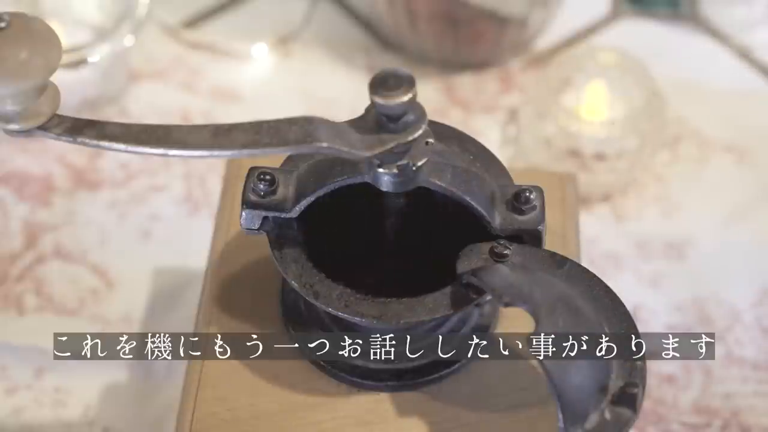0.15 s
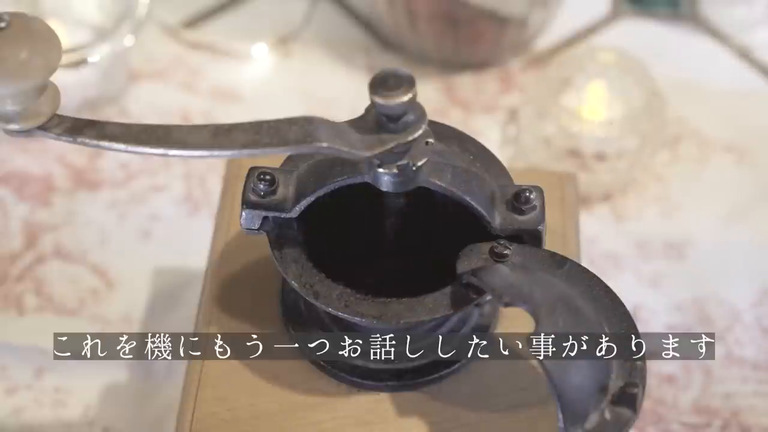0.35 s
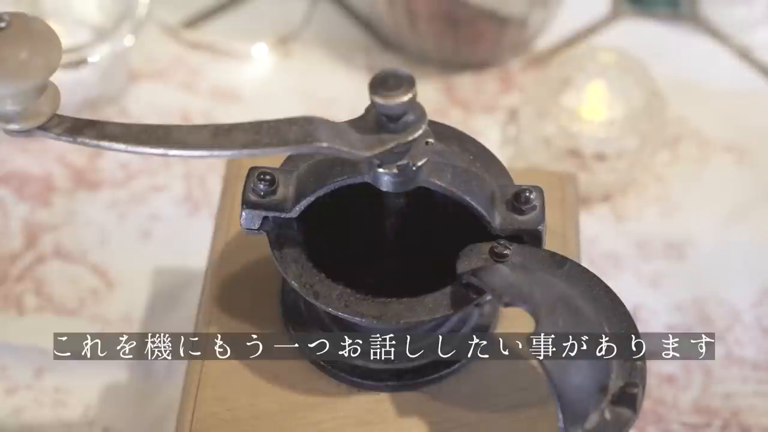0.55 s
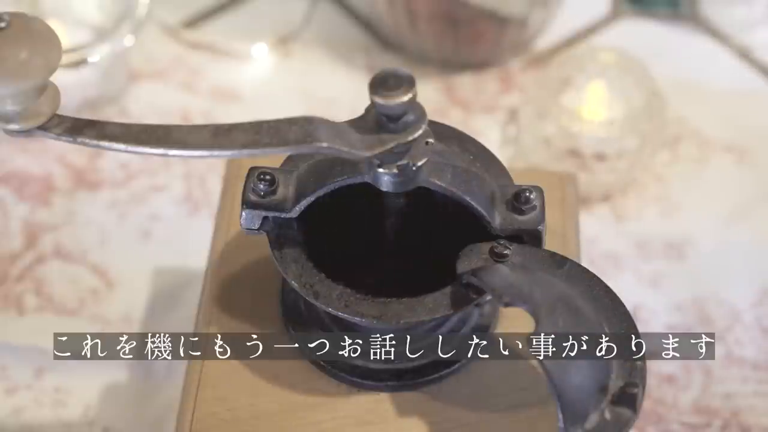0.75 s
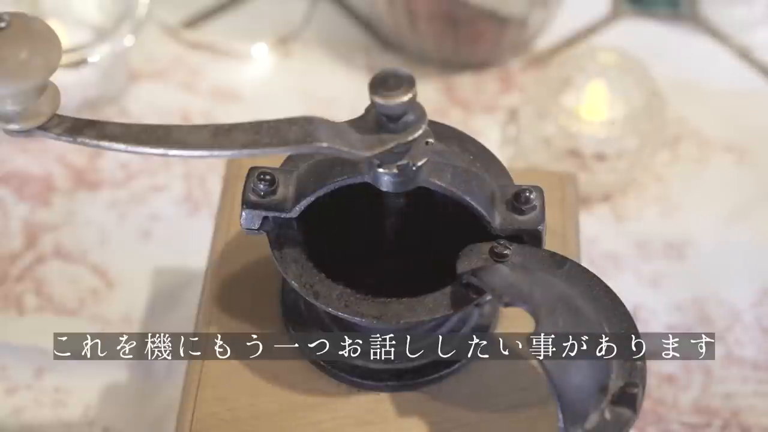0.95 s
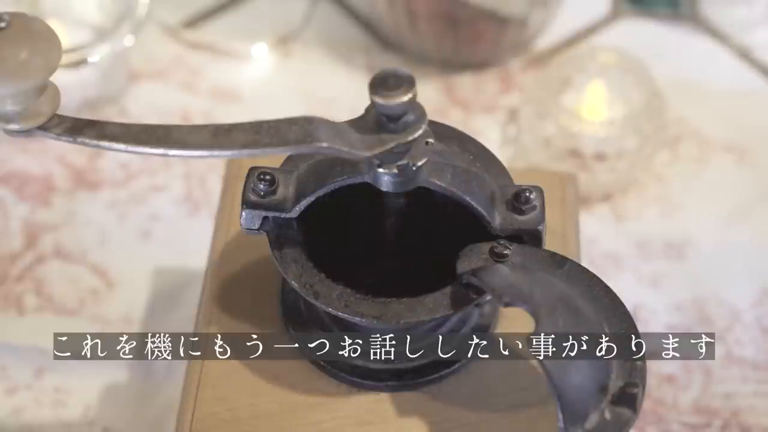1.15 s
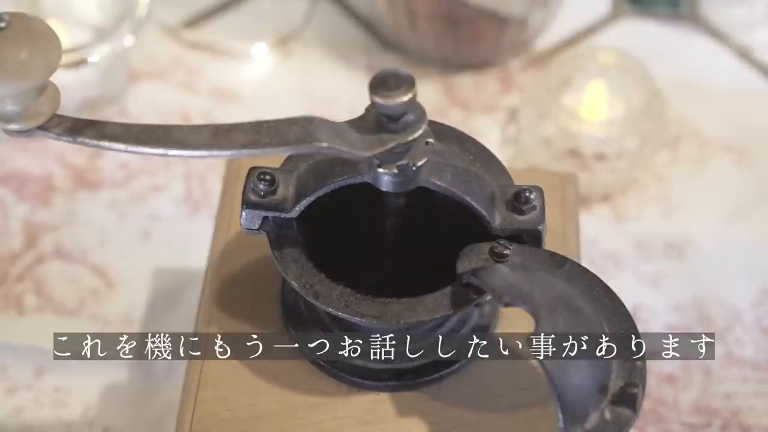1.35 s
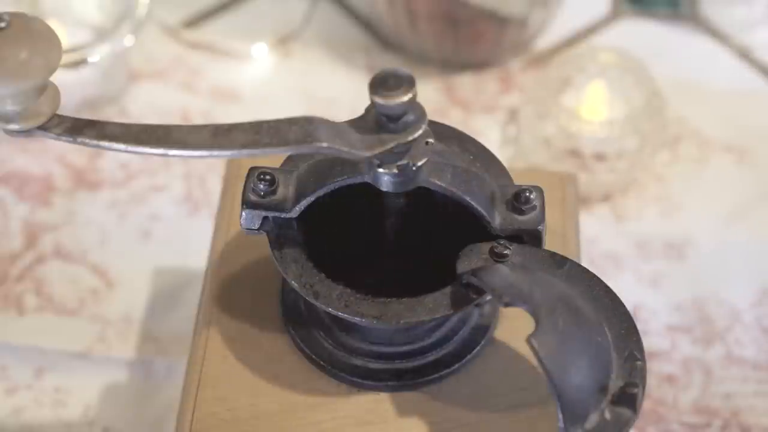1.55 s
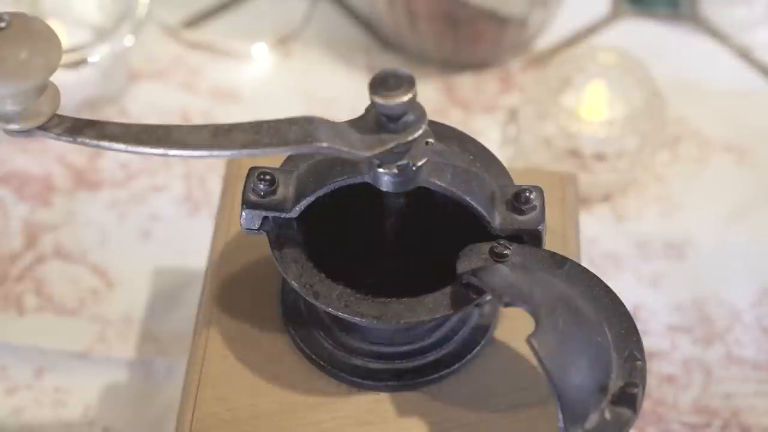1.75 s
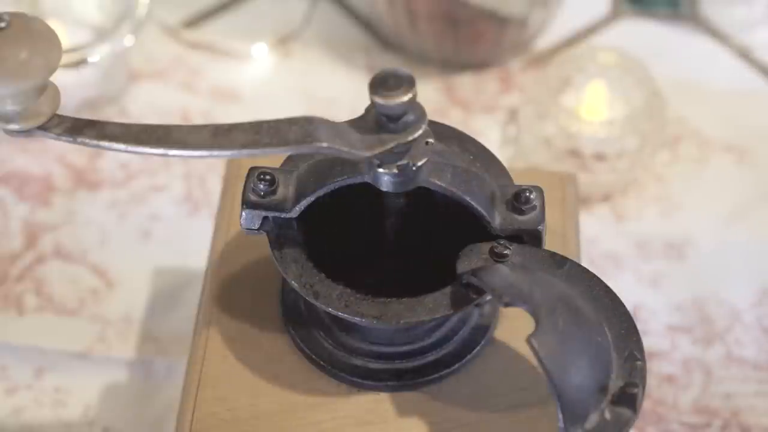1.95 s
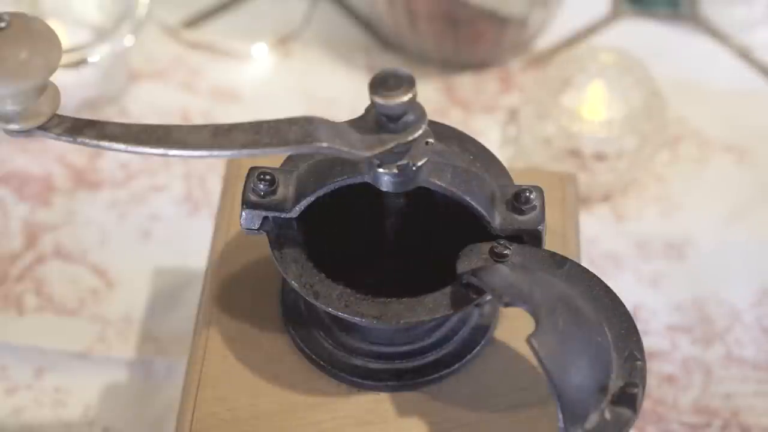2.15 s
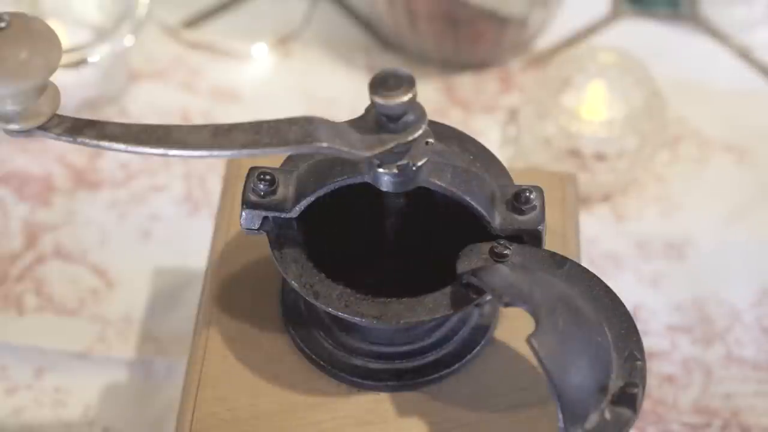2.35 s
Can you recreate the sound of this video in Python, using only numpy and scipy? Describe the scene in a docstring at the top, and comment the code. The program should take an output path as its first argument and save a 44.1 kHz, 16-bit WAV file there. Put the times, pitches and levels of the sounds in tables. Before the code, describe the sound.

Coffee beans rattle into a hand grinder's iron hopper in crisp bursts, the wooden base knocking at first; midway the lid clanks in a quick double blow, then beans thin out. Close microphone, quiet small kitchen, mono.

```python
"""Coffee beans in a hand grinder

Coffee beans rattle in bursts against an iron hopper: each contact excites short, damped modes.
The iron lid clanks once, in two close blows; the wooden base knocks and rumbles on the table.
Low thuds swell in the table top. A small quiet kitchen adds brief echoes, faint noise and a hum.
"""
import sys
import numpy as np
from scipy import signal
from scipy.fft import rfft, irfft, next_fast_len
from scipy.io import wavfile

SR = 44100
rng = np.random.default_rng(int(sys.argv[2]) if len(sys.argv) > 2 else 0)


def volts_from_decibels(level):
    """Turn decibel levels (scalar or array-like) into linear amplitude factors."""
    exponent = np.asarray(level, float) / 20
    return 10 ** exponent


def persist_wave(psi):
    """Save psi, clipped to +-1, as 16-bit WAV."""
    counts = np.round(np.clip(psi, -1, 1) * 32767).astype(np.int16)
    wavfile.write(sys.argv[1], SR, np.atleast_2d(counts).T)


N = 112455

# Modes of the iron hopper: f/Hz, relative level/dB, T60/s
HOPPER_MODES = [(1634, -11.5, 0.022), (1802, -9, 0.015), (3350, 0.5, 0.013), (3500, 1.5, 0.0087),
                (4400, -17.5, 0.018), (4800, -6, 0.014), (6114, 0, 0.014), (6710, 5.5, 0.0026),
                (7190, -9, 0.068), (7500, -6.5, 0.043), (8590, -9, 0.086), (9350, 1.5, .015),
                (10110, 1.5, 0.015), (11500, -11, 0.032)]
# Modes of the wooden base: f/Hz, relative level/dB, T60/s, gain per dB of depth/1
BASE_MODES = [(125, -19.5, 0.056, 0.032), (208, -16, 0.042, 0.73), (260.5, -10.5, 0.035, 0.99),
              (360.3, -7.5, 0.03, 0.27), (491, -9.5, 0.022, -0.13), (645, -7.5, 0.02, -0.41),
              (820, -2.5, 0.016, -0.26), (947, -3.5, 0.027, 0.14), (1129, -1.5, 0.016, 0.28)]


def rms_one(x):
    """Normalisation by the root mean square: scale to rms 1."""
    return x / np.sqrt(np.mean(x ** 2) + 1e-20)


def in_time(rows):
    """Linear interpolation: each column after the time becomes a curve with one value per sample."""
    times, *columns = np.transpose(rows)
    t = np.arange(N) / SR
    return [np.interp(t, times, column) for column in columns]


def at_hz(points, hz):
    """Spectral envelope: level read from a table, linear in dB over log frequency."""
    table_hz, table_db = np.array(points).T
    return np.interp(np.log(hz), np.log(table_hz), table_db)


def strike(s, db, modes, scatter_db, alike=False):
    """Modal synthesis: blows at times s excite damped modes, with newly scattered strengths each time.

    db broadcasts to blows x modes; alike gives every mode the same sign.
    """
    contact_cycles = 2.1  # a finite contact makes each mode swell in, near its own pitch
    at = np.clip((np.asarray(s) * SR).astype(int), 0, N - 1)
    shape = (len(at), len(modes))
    draw = rng.standard_normal((len(at), 2, len(modes)))
    sign = 1 if alike else np.sign(draw[:, 1])
    size = sign * volts_from_decibels(np.broadcast_to(db, shape) + scatter_db * draw[:, 0])
    out = np.zeros(N)
    for k, (hz, mode_db, t60, *_) in enumerate(modes):
        clicks = np.bincount(at, size[:, k], N) + 1e-18
        w = 2 * np.pi * min(hz, 0.45 * SR) / SR
        decay = volts_from_decibels(-60 / (t60 * SR))  # per sample
        ring = signal.lfilter([0, np.sin(w)], [1, -2 * decay * np.cos(w), decay ** 2], clicks)
        soft = np.exp(-w / (2 * contact_cycles))
        contact_gain = np.array([1, 0, -1]) * (1 - soft ** 2) / 2
        out += volts_from_decibels(mode_db) * signal.lfilter(contact_gain, [1, -2 * soft * np.cos(w), soft ** 2], ring)
    return out


def shower(per_s, spread_db):
    """Poisson-like process: random contact times and uneven, exponentially spread sizes in dB."""
    born = rng.random(N) < per_s / SR
    size = np.minimum(rng.exponential(1, N), 4)
    return np.flatnonzero(born) / SR, spread_db * size[born][:, None]


def tilt(slope_db, modes, centre_hz):
    """Spectral tilt: gain per blow and mode for a slope in dB per octave."""
    return np.outer(slope_db, np.log2(np.array(modes)[:, 0] / centre_hz))


def around(pitch_hz, narrow_db, modes):
    """Selective excitation: modes lose level per octave away from each blow's own pitch."""
    octaves = np.log2(np.array(modes)[:, 0] / pitch_hz[:, None])
    return -np.abs(narrow_db)[:, None] * np.abs(octaves)


def loudness_db(modes, per_s):
    """Energy summation: rms level of the modes under per_s unit blows a second."""
    energy = sum(volts_from_decibels(db) ** 2 * t60 for _, db, t60 in modes)
    return 10 * np.log10(per_s * energy / (4 * np.log(1000)))


def crack_modes(cycles):
    """Damped resonance: hard beans crack in closely spaced modes of T60 = cycles / f."""
    # Spectrum of a dry bean crack: f/Hz, relative level/dB
    crack_spectrum = [(1400, -38.5), (1800, -27.5), (2400, -13.5), (3360, -13), (3960, -4), (6290, -0.5),
                      (14800, -5.5), (15900, -4), (16400, -59.5)]
    return [(hz, at_hz(crack_spectrum, hz) + 20 * np.log10(hz / 6000), cycles / hz)
            for hz in np.geomspace(1500, 16200, 34)]


def bean_hits():
    """Impact excitation: loud single beans crack at a touch and two rebounds, and ring the hopper once."""
    # Loudest bean hits: t/s, level/dB before the trims below, pitch f/Hz,
    # narrowness/dB per octave (sign ignored), extra iron ring/dB
    hits = [(0.175, -28, 4900, 28, 14), (0.178, -20, 4670, 22, 13), (0.1938, -14, 4960, 20, 5),
            (0.208, -13, 4650, 11, 0), (0.2508, -21, 4820, 23, 18.5), (0.3118, -19, 8990, -1, 1.5),
            (0.35, -13.5, 3470, 16, 8), (0.376, -2.5, 3430, 12, -2.5), (0.419, -20, 3400, 11, 15.5),
            (0.564, -16.5, 7100, 13, 7.5), (0.609, -13.5, 3520, 5, 2), (0.6477, -30, 6600, 9, 13.5),
            (0.7012, -20, 6020, -1, 6.5), (0.721, -13.5, 9350, 5, -5.5), (0.728, -21, 6210, -1, 8),
            (0.7547, -14, 3400, 9, 5), (0.7781, -16, 3350, 0, -3), (0.8052, -8.5, 6160, 0.5, 6.5),
            (0.8842, -15.5, 5000, -1, 0.5), (0.8912, -9.5, 7650, 12, 5), (0.936, -18, 3400, -1, 2),
            (0.9568, -3.5, 5600, 15.5, -1), (0.9865, -10, 9500, 3.5, 0), (1.021, -5.5, 9440, 11.5, -13),
            (1.0283, -14, 9430, -0.5, -1), (1.0903, -3, 10640, 7, 6.5), (1.095, -5, 11500, 18, 4),
            (1.203, -27, 8900, 17, -8), (1.233, -41, 5840, 11, 12), (1.2485, -43, 6040, 6.5, 17.5),
            (1.2862, -38, 6490, 4.0, 2), (1.3, -32.5, 4900, 6, 15), (1.308, -13.5, 8000, 7, -12),
            (1.313, -14.5, 4970, 1, 1), (1.314, -12.5, 6940, -1, -18), (1.319, -7, 9000, 0, -11.5),
            (1.3327, -7, 10300, 16, 6), (1.351, -13, 4730, 15, -1), (1.3998, -16.5, 5940, 7, 2.5),
            (1.4075, -22, 7000, -1, -4), (1.437, -8.5, 7690, 3, -9), (1.434, -18.5, 3600, 6.5, 9),
            (1.456, -13.5, 3500, 12, 9), (1.465, -19, 3480, 13.5, 1.5), (1.5014, -12.5, 11460, 6.5, -5.5),
            (1.5064, -14.5, 15200, 1.5, -5.5), (1.514, -14.5, 6000, -1.5, -9), (1.537, -7, 8000, 7.5, -1),
            (1.561, -15, 5850, 6.5, -1), (1.591, -12, 6020, 0, 2.5), (1.593, -13, 3400, 6.5, 9.5),
            (1.5965, -18.5, 7500, 1, 9.5), (1.685, -10, 3490, 13, 3.5), (1.739, -13.5, 4920, 8, 17),
            (1.859, -19.5, 5090, 6, -8), (1.8732, -10, 6000, 0.5, 7), (1.9495, -21, 4500, 0, 9),
            (2.0249, -11, 6130, 2, 6), (2.0624, -24, 5840, 4, -8.5), (2.1354, -9.5, 6050, 5.5, 3.5),
            (2.1757, -10, 13400, 3.5, -7), (2.1861, -16, 6130, 3, 7), (2.1936, -12.5, 8590, 0.5, 4.5),
            (2.2686, -20, 6020, 2.5, 2), (2.319, -22.5, 7240, 7, 5), (2.3349, -17.5, 7030, 11.5, -3.5),
            (2.476, -55.5, 4400, -0.5, 5.5), (2.4902, -44.5, 4090, -2.5, 3),
            (2.5043, -29, 4230, 18.5, -10.5)]
    crack_db, ring_db, scatter_db = -17, -22, 5.5
    ring_narrower = 2.92  # the ring falls off this much faster around the pitch
    s, db, pitch_hz, narrow_db, iron_db = np.transpose(hits)
    snap = crack_modes(cycles=13.8)
    contacts = ((0.0002, 0.5), (0.001, -6), (0.0022, -11))  # lag/s, level/dB
    crack_s = np.concatenate([s + lag_s for lag_s, _ in contacts])
    pitch_gain = around(pitch_hz, narrow_db, snap)
    crack_level = np.vstack([(db + crack_db + contact_db)[:, None] + pitch_gain
                             for _, contact_db in contacts])
    crack = strike(crack_s, crack_level, snap, scatter_db)
    ring_level = (db + iron_db + ring_db)[:, None] + around(pitch_hz, ring_narrower * narrow_db, HOPPER_MODES)
    return crack + strike(s, ring_level, HOPPER_MODES, scatter_db)


def bean_flow():
    """Superposition of random impacts: dense small hits, each with its own pitch, crack and ring iron."""
    # Flow of beans: t/s, level/dB before trim, brightness/dB per octave, iron ring/dB before trim
    flow = [
        [0.16, -79, -6, 5],
        [0.195, -43, -7, 2.5],
        [0.294, -46, -14, -3],
        [0.32, -27, -5, 3.5],
        [0.426, -30.5, -6.5, 7],
        [0.536, -51.5, -9.5, 7],
        [0.576, -31.5, -8, 4.5],
        [0.644, -41.5, -5, 7.5],
        [0.8, -33, -1.4, 5.5],
        [0.804, -31, 0, 7.5],
        [0.836, -36, 0.7, 11.5],
        [1.018, -43, -2.6, 4.5],
        [1.08, -49, 0.5, 8],
        [1.095, -40.5, 1, 14],
        [1.15, -53.5, 4, -1],
        [1.2, -60, -1, 3],
        [1.29, -65, -15.5, -9],
        [1.315, -30.5, -9, -14.5],
        [1.345, -34.5, -6.5, -6.5],
        [1.39, -59, 2, -13],
        [1.43, -61.5, -17, 8],
        [1.445, -36.5, 8, 5.5],
        [1.495, -55.5, 0, -13],
        [1.52, -38.5, 8.5, -11.5],
        [1.53, -28, -3, 9],
        [1.544, -27, -6.5, -1],
        [1.588, -25, -6, 4.5],
        [1.656, -44, -6, 10],
        [1.694, -35, -7, 7.5],
        [1.834, -35, -7, 2.5],
        [1.87, -31, -4, 6],
        [1.912, -38.5, -2, 9],
        [2.214, -30, 1.5, 5.5],
        [2.344, -54, 2, 7.5],
        [2.456, -97, -1, -3.5],
        [2.506, -60.5, -6, -11],
        [2.55, -70, -7, -4.5],
    ]
    per_s, spread_db, scatter_db = 1400, 3.5, 4.5
    trim_db, ring_trim_db = -6, -9
    level, bright, iron = in_time(flow)
    s, db = shower(per_s, spread_db)
    at = (s * SR).astype(int)
    db = db + level[at, None] + trim_db
    own_hz = 3000 * 5 ** rng.random(len(at))  # 3 to 15 kHz
    own_narrow_db = np.full(len(at), 4.5)  # dB per octave
    out = np.zeros(N)
    for modes, share_db in ((crack_modes(cycles=72), 0), (HOPPER_MODES, ring_trim_db + iron[at, None])):
        colour_db = tilt(bright[at], modes, 4710) + around(own_hz, own_narrow_db, modes)
        out += strike(s, db + share_db - loudness_db(modes, per_s) + colour_db, modes, scatter_db)
    return out


def beans():
    """Linear superposition: single hits and dense flow share one band limit."""
    band = signal.butter(8, [1410, 15240], "band", fs=SR, output="sos")  # Hz
    return signal.sosfilt(band, bean_hits() + bean_flow())


def lid():
    """Modal beating: two blows ring the lid's close mode pairs; the second has far less crack."""
    # Blows on the lid: t/s, level/dB, extra level of the short crack modes/dB
    clanks = [(1.5254, -23.5, 14.5), (1.546, -18.5, -17)]
    # Modes of the lid: f/Hz, relative level/dB, T60/s
    lid_modes = [(1725, -7, .18), (1758, -9, .18), (4622, -8, .09), (4661, -10, .09), (6552, -14, .08),
                 (950, -20, .04), (2435, -20, .05), (2200, -5, .006), (2800, -1.5, .006),
                 (3500, -0.5, .006), (4200, -1.5, .006), (7000, -6, .006)]
    s, db, crack_db = np.transpose(clanks)
    is_crack = np.array(lid_modes)[:, 2] < 0.015  # s
    return strike(s, db[:, None] + np.outer(crack_db, is_crack), lid_modes, scatter_db=3.5, alike=True)


def deepen(depth_db):
    """Modal weighting: depth raises the base's modes near 200-260 Hz and hollows out 490-820 Hz."""
    return np.outer(depth_db, np.array(BASE_MODES)[:, 3])


def base_knocks():
    """Impact excitation: separate knocks ring the modes of the wooden base."""
    # Knocks of the base: t/s before the lag, level/dB before trim, depth/dB
    knocks = [
        [0.2075, -20.5, 9],
        [0.2388, -14, 3.5],
        [0.258, -38, -4],
        [0.363, -30, -25],
        [0.415, -16, -15],
        [0.5265, -23.5, 5.5],
        [0.563, -20, 5.5],
        [1.316, -42, -14],
        [1.43, -41, -15],
        [1.569, -24, -6.5],
        [1.589, -23.5, -1],
        [1.922, -33.5, 15],
        [1.933, -21, -10],
        [1.954, -40, 0],
        [1.978, -35.5, 16.5],
        [2.258, -29, 1],
        [2.278, -19.5, -1],
        [2.294, -38, 10],
    ]
    lag_s, trim_db = 0.00241, -11
    s, db, depth = np.transpose(knocks)
    return strike(s + lag_s, (db + trim_db)[:, None] + deepen(depth), BASE_MODES, scatter_db=2.5)


def base_rumble():
    """Random excitation: many small contacts with the table merge into a rumble of the base's modes."""
    # Rumble of the base: t/s, level/dB before trim, depth/dB
    rumble = [
        [0.197, -50, 17],
        [0.21, -33.5, 4],
        [0.237, -38.5, 8],
        [0.3, -52, -10],
        [0.345, -41, -17],
        [0.366, -36.5, -13],
        [0.428, -35, -17],
        [0.51, -54.5, -7],
        [0.52, -57, -12],
        [0.528, -37, 1],
        [0.562, -40, 4],
        [0.66, -60.5, -4],
        [1.499, -77.5, 2],
        [1.525, -45.5, -13.5],
        [1.597, -32, -11],
        [1.67, -51, -3.5],
        [1.752, -44.5, -8],
        [1.808, -58.5, -1],
        [1.872, -51, -2],
        [1.908, -63, -10],
        [1.934, -35, -5.5],
        [2.066, -64.5, -5.0],
        [2.247, -60.5, -15],
        [2.258, -35, 6],
        [2.277, -35.5, 1],
        [2.4, -96.5, -3],
    ]
    per_s, spread_db, trim_db = 500, 2.17, -2
    level, depth = in_time([(0.165, -95, 0.), *rumble, (2.45, -95, 0.)])
    s, db = shower(per_s, spread_db)
    at = (s * SR).astype(int)
    # a steady trial rumble gives the gain to unit level
    scale_db = -20 * np.log10(np.std(strike(s, db, BASE_MODES, scatter_db=6.5)))
    contact_db = db + scale_db + trim_db + level[at, None] + deepen(depth[at])
    return strike(s, contact_db, BASE_MODES, scatter_db=3.5)


def base():
    """Linear superposition: knocks and rumble of the base share one soft band limit."""
    band = signal.butter(3, [140, 1510], "band", fs=SR, output="sos")  # Hz
    return signal.sosfilt(band, base_knocks() + base_rumble())


def thuds():
    """Amplitude modulation: Gaussian swells of low sines form the thuds of the table top."""
    # Thuds through the table: centre t/s, f/Hz, peak level/dB, Gaussian half-width (to 1/e)/s
    swells = [(1.632, 115.8, -46.5, 0.023), (1.777, 110, -50.5, 0.017)]
    t = np.arange(N) / SR
    out = np.zeros(N)
    for s, hz, db, width_s in swells:
        out += volts_from_decibels(db) * np.exp(-((t - s) / width_s) ** 2) * np.sin(2 * np.pi * hz * t)
    return out


def kitchen(x):
    """Reverberation by feedback: twelve delay loops dull on every round, then short delays smear them."""
    t60_s, wall_cut_hz = 0.14, 7400
    size = next_fast_len(N + SR)
    z = np.exp(-2j * np.pi * np.arange(size // 2 + 1) / size)  # delay of one sample
    dull = np.exp(-2 * np.pi * wall_cut_hz / SR)
    response = 0
    lags = (rng.uniform(0.006, 0.03, 12) * SR).astype(int)
    for k, lag in enumerate(lags):
        loop = volts_from_decibels(-60 * lag / SR / t60_s) * (1 - dull) / (1 - dull * z) * z ** lag
        response = response + (-1) ** k * loop / (1 - loop)
    for lag in (47, 131, 223):  # samples
        response = response * (z ** lag - 0.6) / (1 - 0.37 * z ** lag)
    return irfft(rfft(x, size) * response, size)[:N]


def room_floor():
    """Spectral shaping: white noise weighted in frequency gives steady room noise, beside a pure low hum."""
    # Spectrum of the room noise: f/Hz, relative level/dB
    noise_spectrum = [(29, -20), (50, -8.5), (159, -3.5), (218, -8.5), (329, -8.5), (630, -9), (711, -7),
                      (884, -16), (1050, -12.5), (1500, -22), (16000, -42)]
    noise_db, hum_db, hum_hz = -69, -75.5, 40.5  # levels are rms
    hz = np.maximum(np.arange(N // 2 + 1) * SR / N, 10)
    hum = volts_from_decibels(hum_db) * np.sqrt(2) * np.sin(2 * np.pi * hum_hz * np.arange(N) / SR)
    noise = irfft(rfft(rng.standard_normal(N)) * volts_from_decibels(at_hz(noise_spectrum, hz)), N)
    return hum + volts_from_decibels(noise_db) * rms_one(noise)


def scene():
    """Superposition of direct and reverberant sound: the grinder close by, in one channel."""
    room_db = -14.5
    near = beans() + lid() + base()
    return (near + volts_from_decibels(room_db) * kitchen(near) + thuds() + room_floor())[None]


def top_cut(x):
    """Nothing passes above the cut-off."""
    return signal.sosfilt(signal.butter(12, 16830, fs=SR, output="sos"), x)


def record(dry):
    """Unity gain: the finished mix is passed on with no equalisation or compression."""
    return top_cut(dry)


dry = scene()
out = record(dry)
persist_wave(out)
```